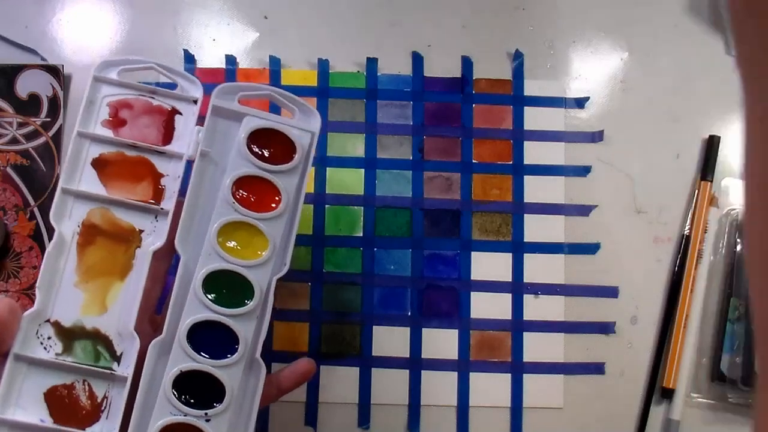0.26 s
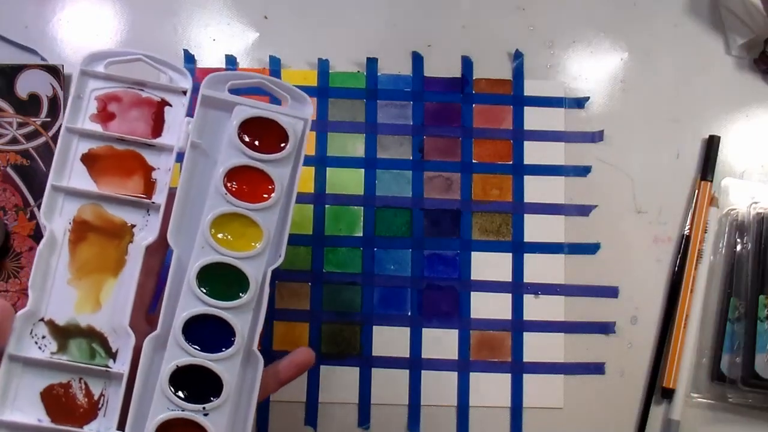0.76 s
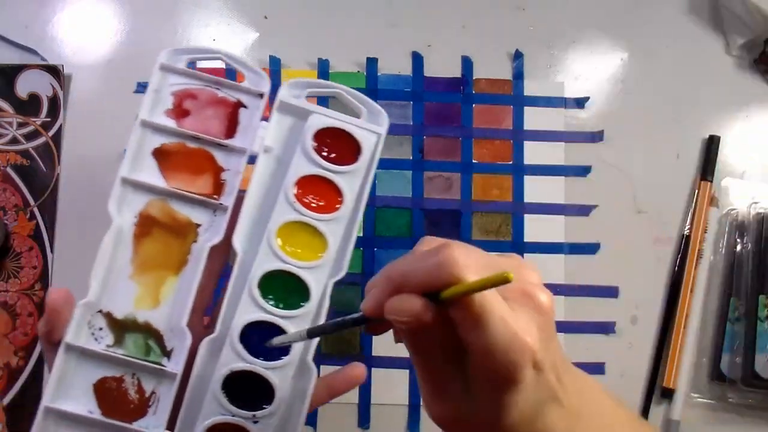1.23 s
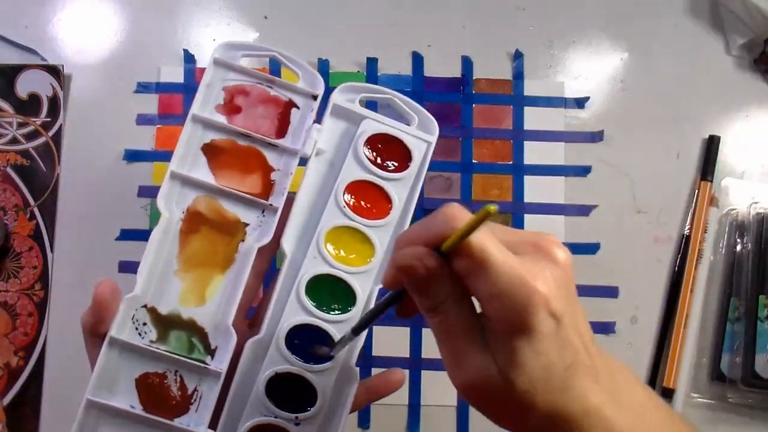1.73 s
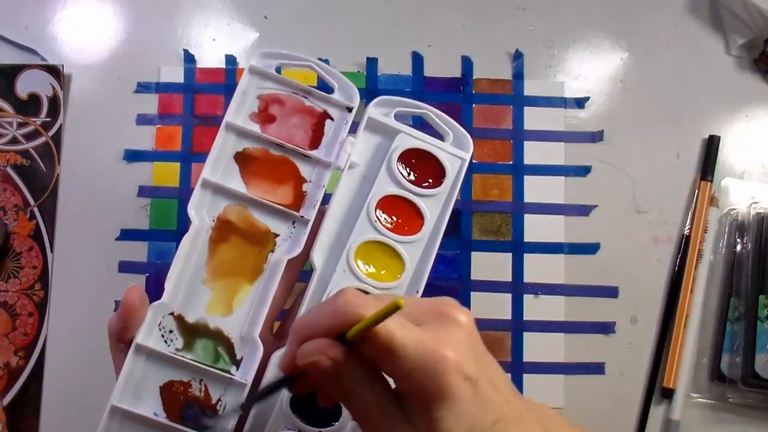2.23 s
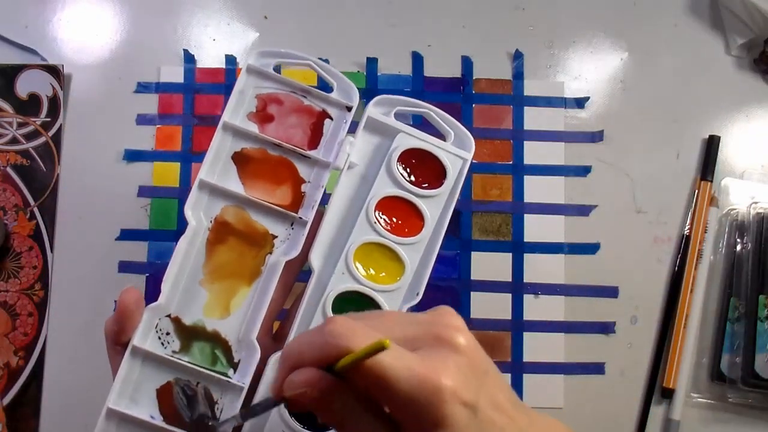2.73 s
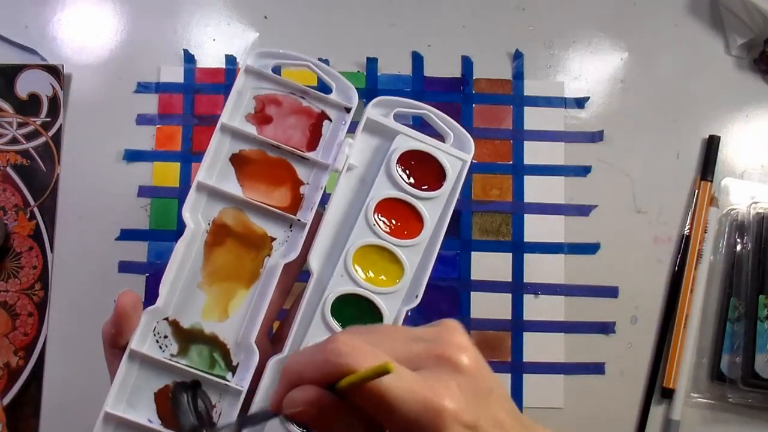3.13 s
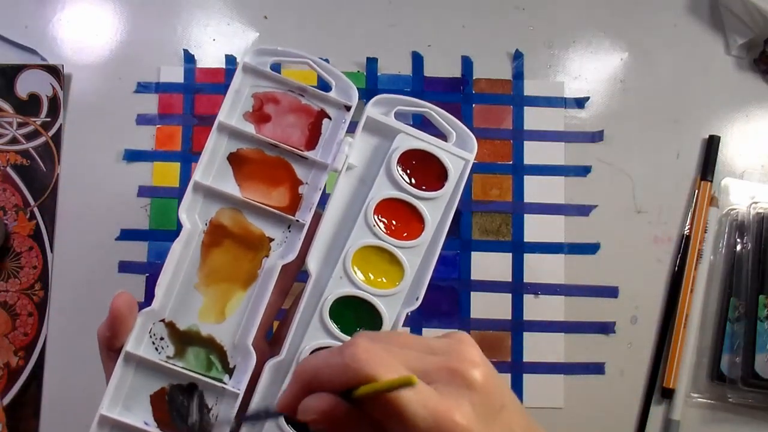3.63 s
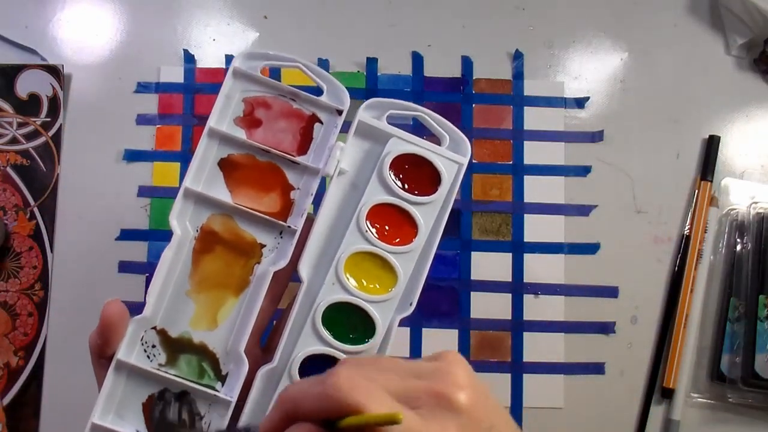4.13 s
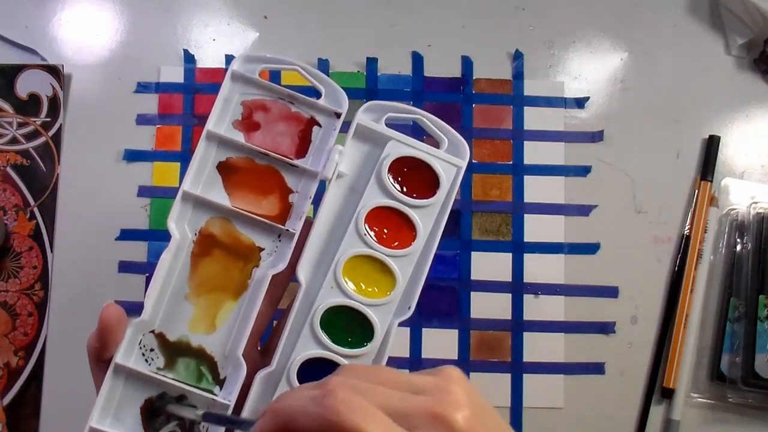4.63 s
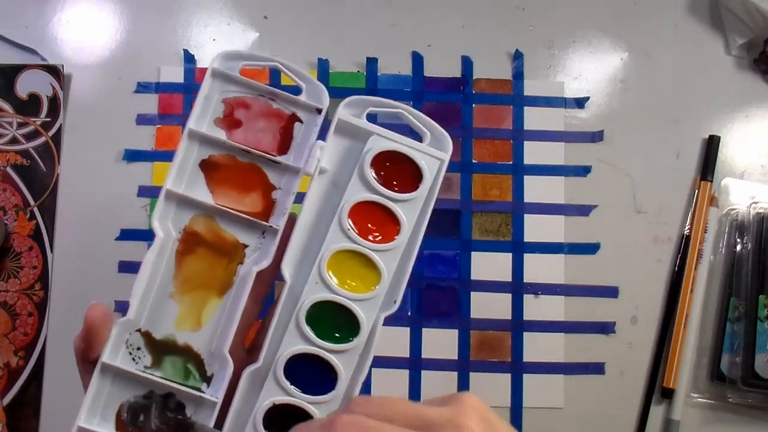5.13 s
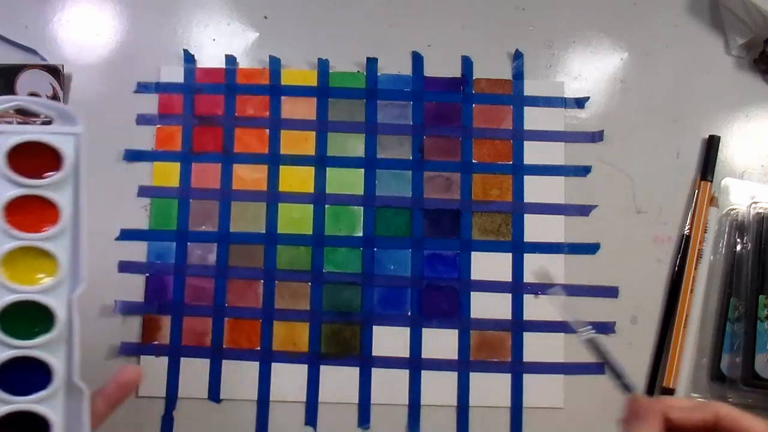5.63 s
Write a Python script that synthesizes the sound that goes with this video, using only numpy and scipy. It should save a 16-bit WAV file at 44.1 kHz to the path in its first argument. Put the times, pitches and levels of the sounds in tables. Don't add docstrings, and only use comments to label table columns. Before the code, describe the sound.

A brush is rinsed for half a second in a glass cup: gurgles, fine spray and rapid handle knocks, one very sharp crack, then a ringing rim clink. Tiny wet pops follow in near silence. Then soft bristle swishes and light metal-on-plastic taps on a paint tray, ending with a faint scrape over paper. Close stereo microphone, small room, steady low hum and hiss.

```python
import sys
import numpy as np
from scipy import signal
from scipy.fft import rfft, irfft
from scipy.io import wavfile

SR = 44100
rng = np.random.default_rng(int(sys.argv[2]) if len(sys.argv) > 2 else 0)


def bounce(signal):
    frames = np.transpose(np.atleast_2d(signal))
    limited = np.clip(frames, -1, 1)
    pcm = np.round(limited * 32767).astype(np.int16)
    wavfile.write(sys.argv[1], SR, pcm)


def undo_db(level):
    steps = np.asarray(level, float) / 20
    return 10 ** steps


N = 258426
TIME = np.arange(N) / SR


def rms_one(x):
    return x / np.sqrt(np.mean(x ** 2) + 1e-20)


def curve(points, hz):
    table_hz, value = np.transpose(points)
    return np.log(hz), np.log(table_hz), value


def spectrum_hz():
    return np.maximum(np.arange(N // 2 + 1) * SR / N, 1)


def coloured(white, points):
    db = np.interp(*curve(points, spectrum_hz()), left=-80, right=-80)
    return rms_one(irfft(rfft(white) * undo_db(db), N))


def train(times, sizes):
    out = np.zeros(N)
    np.add.at(out, (np.asarray(times) * SR).astype(int), sizes)
    return out


def ring(clicks, hz, t60):
    r, w = undo_db(-60 / (t60 * SR)), 2 * np.pi * hz / SR
    return signal.lfilter([0, np.sin(w)], [1, -2 * r * np.cos(w), r * r], clicks + 1e-18)


def strike(clicks, hz, t60, cycles):
    return ring(clicks, hz, t60) - ring(clicks, hz, cycles / hz)


def resonate(x, hz, width_hz):
    r = np.exp(-np.pi * width_hz / SR)
    feedback = [1, -2 * r * np.cos(2 * np.pi * hz / SR), r * r]
    return signal.lfilter([(1 - r * r) / 2, 0, (r * r - 1) / 2], feedback, x)


def grains(per_s, spread_db):
    sizes = undo_db(spread_db * np.minimum(rng.exponential(1, N), 4)) * rng.choice([-1, 1], N)
    return rms_one(sizes * (rng.random(N) < per_s / SR))


def pan(x, db):
    return np.array([x * undo_db(db / 2), x * undo_db(-db / 2)])


# (time [s], vigour [dB], depth of the brush [0-1])
SWIRL = [
    (0, -95, 0.5),
    (.045, -55.5, 0),
    (.1, -58, .02),
    (.13, -47, 0.16),
    (.195, -57, 0.1),
    (.215, -37.5, 0),
    (.27, -41.5, 0.64),
    (.34, -41.5, 0.45),
    (.49, -81, 0.94),
]


def swirl():
    s, vigour_points, depth_points = np.transpose(SWIRL)
    vigour_db = np.interp(TIME, s, vigour_points)
    depth = np.interp(TIME, s, depth_points)
    gurgle_db = vigour_db - 27.5 + 40.5 * depth
    spray_db = -55 + 0.67 * (vigour_db + 46.5) - 13.5 * depth
    return gurgle_db, vigour_db, spray_db


CUP_LOW_HZ = [705, 970, 1230, 1292, 1340, 1444, 1503, 1542, 1736, 1824, 2030]
# (level [dB], t60 [s])
CUP = [(-6, 0.039), (-3.5, 0.059), (-7, 0.063), (1, 0.11), (1, 0.027), (-13, 0.14), (7.5, 0.023),
       (-0.5, 0.044), (-3, 0.067), (-2, 0.042), (-0.5, 0.033),
       (-3.5, 0.034), (-1.5, 0.032), (-10, 0.026), (-2, 0.025), (-3, 0.046), (-8.5, 0.031),
         (-12.5, 0.046), (-17, 0.021)]
CUP_HIGH_HZ = [3170, 3275, 3590, 3920, 4830, 5890, 6300, 7600]
# (time [s], level [dB], centre frequency [Hz])
KNOCKS = [(.030, -39, 6340), (0.0353, -31.5, 1800), (.046, -38, 3170), (.047, -40, 6300), (.06, -45, 6300),
          (.072, -46, 6100), (.093, -46, 5200), (.143, -45, 4830), (.0807, -47, 1570),
          (0.1023, -30.5, 1520), (.144, -36.5, 3200), (.192, -37, 4830), (0.207, -38, 1500),
          (.2745, -41, 1300), (0.129, -41, 3250), (0.214, -33, 3370), (.337, -30, 5900), (0.251, -41, 3950),
          (.245, -39, 5900), (.334, -34, 3300), (.3372, -30, 3300), (0.3432, -32, 1610), (.345, -42, 3300),
          (.388, -54, 2960), (.398, -40, 3240), (.466, -52, 3270)]
# (time [s], level [dB], centre frequency [Hz], reach [octaves])
SLAPS = [
    (.104, -40, 3980, 0.96),
    (.129, -46, 2200, 0.45),
    (.173, -42, 5200, .37),
    (.207, -37, 4270, 1),
    (.222, -28, 1960, 0.33),
    (.246, -42, 5000, 0.46),
    (.276, -36, 755, 0.46),
]


def cup():
    knock_reach_oct = 0.15
    s, db, centre, reach = np.transpose(SLAPS + [(*knock, knock_reach_oct) for knock in KNOCKS])
    _, bubbles_db, spray_db = swirl()
    out = 0
    for hz, (mode_db, t60) in zip(CUP_LOW_HZ + CUP_HIGH_HZ, CUP):
        near = np.exp(-.5 * (np.log2(hz / centre) / reach) ** 2)
        blows = train(s, undo_db(db + mode_db - 3.0) * near * rng.choice([-1, 1], len(s)))
        patter_db = bubbles_db - 36.5 if hz < 2500 else spray_db - 24
        patter = grains(500, 1.9) * undo_db(mode_db + patter_db)
        tone = resonate(strike(blows + patter, hz, t60, cycles=5.0), hz, .4 * hz)
        out = out + pan(tone, -3.0 * (hz > 2500))
    return out


# (frequency [Hz], level [dB per Hz])
SPRAY_COLOUR = [(2000, -8), (2800, 0.5), (6000, -9), (12000, -9.5), (15000, -20)]


def slosh():
    gurgle_db, bubbles_db, spray_db = swirl()
    out = undo_db(spray_db - 3.5) * coloured(grains(9000, 2.5), SPRAY_COLOUR)
    kinds = (gurgle_db - 5.0, 470, 1150, 140), (bubbles_db, 1150, 2300, 200), (spray_db, 2500, 6800, 450)
    for level_db, low_hz, high_hz, count in kinds:
        for when, pitch, size in rng.random((count, 3)):
            i = int(when * .48 * SR)
            hz = low_hz * (high_hz / low_hz) ** pitch
            cycle = np.arange(2200) * hz / SR
            shape = (1 - np.exp(-cycle / 0.33)) * undo_db(-60 * cycle / 60)
            tone = np.sin(2 * np.pi * cycle * (1 + 0.0012 * cycle))
            out[i:i + 2200] += undo_db(level_db[i] + 4.0 + 5.3 * (size - 2.0)) * shape * tone
    return pan(out, -0.47)


# (time [s], level [dB], frequency [Hz], length [s])
GULPS = [(.1025, -28, 1252, .0055), (.1128, -26.5, 1288, .011), (.129, -42, 1390, 0.0077),
         (.146, -46, 1730, 0.018), (.146, -48, 1330, .008), (.172, -46.5, 1284, 0.012),
         (.2067, -27.5, 1315, 0.013), (.2215, -29, 1297, .013), (.2215, -32, 1563, 0.0095),
         (.2215, -31.5, 2043, 0.01), (.225, -32, 1730, 0.0087), (.235, -40, 1690, 0.0091),
         (.241, -41, 1365, .006), (.245, -41, 1550, .006), (.249, -38, 1790, .006),
         (.25, -46.5, 710, 0.0174), (.252, -45, 2160, .008), (.257, -42, 1760, 0.0057),
         (.2742, -25, 1520, 0.0076), (.286, -36, 1470, 0.0067), (.298, -40, 1470, .005),
         (.304, -37, 1510, 0.0086), (.3172, -34.5, 1820, 0.008), (.326, -39, 1510, .005),
         (.334, -47, 964, .012), (.342, -37, 1760, .006)]


def gulps():
    rise_per_s, sag_db_per_s, swell_s, burst_t60_s = 1.9, 154, 0.0016, 0.016
    out, age = np.zeros(N), np.arange(SR // 10) / SR
    for s, db, hz, length in GULPS:
        level_db = db - sag_db_per_s * age - 60 * np.maximum(age - length, 0) / burst_t60_s
        cycles = hz * age * (1 + rise_per_s * (age - length) / 2)
        tone = (1 - np.exp(-age / swell_s)) * np.sin(2 * np.pi * cycles)
        out[int(s * SR):][:len(age)] += undo_db(level_db) * tone
    return out


# (time [s], peak level [dB], level of the spray after it [dB], spray t60 [s])
CRACKS = [(.32, -56, -53.5, 0.19), (0.3365, -27, -51, 0.022), (0.3438, -11.5, -44, 0.079),
          (0.3448, -17, -58, 0.03), (0.389, -53, -47, 0.078), (0.6061, -22.5, -42, 0.12),
          (.64, -60, -60, 0.41), (.69, -59, -58.5, 0.14), (3.0463, -40, -48.5, 0.067),
          (3.151, -48, -49, 0.039), (3.886, -52, -57, 0.032), (3.9063, -35, -44, 0.032)]
# (frequency [Hz], level [dB per Hz])
CRACK_COLOUR = [(1180, -51), (2000, -2), (2690, -6), (3230, -4), (4380, -2), (9920, -10), (13800, -8),
                (15000, -42)]


def cracks():
    cup_side_db, tray_side_db = 0, 6
    spray, out = coloured(rng.standard_normal(N), CRACK_COLOUR), np.zeros((2, N))
    for s, peak_db, spray_db, t60 in CRACKS:
        age = np.maximum(TIME - s, 0)
        shape = undo_db(peak_db - 23.5 - 60 * age / 0.009) + undo_db(spray_db - 60 * age / t60)
        click = resonate(train([s], undo_db(peak_db + 11.0)), hz=8550, width_hz=5000)
        out += pan(click + spray * shape * (TIME >= s), cup_side_db if s < 1 else tray_side_db)
    return out


# (frequency [Hz], level [dB], t60 [s])
RIM = [(4900, -20, 0.19), (5071, -17, .2), (5123, -19, .2), (5774, -16, .12), (5996, -4, 0.12),
       (6032, -5, 0.12), (6079, -2, 0.16), (6163, -4, .14), (6266, -11, .12), (6342, -14, 0.12),
       (6446, -13, 0.12), (6532, -16, .12), (6734, -16, .1), (8900, -17, 0.08)]
# (frequency [Hz], level [dB], t60 [s])
HANDLE = [(608, -11, 0.031), (660, -10, 0.03), (1324, -11, 0.045), (1800, -2.5, 0.063), (1960, -6.5, 0.046),
          (3300, -3, 0.025), (4130, -4.5, 0.027), (6110, 7.5, 0.015)]
# (time [s], level [dB], left minus right [dB])
CLINKS = [
    (.591, -64.5, -2),
    (0.6067, -31, 0),
    (.692, -60, -4),
]


def rim():
    s, db, side_db = np.transpose(CLINKS)
    out = 0
    for hz, mode_db, t60 in RIM + HANDLE:
        tone = strike(train(s, undo_db(db + mode_db)), hz, t60, cycles=5.1)
        out = out + pan(tone, side_db.mean() * min(hz / 5000, 1))
    return out


PAIR_HZ = [1730.2, 1738.3]
# (level [dB], t60 [s])
PAIR = [(-7.5, 0.76), (-11.5, 0.67)]


def rim_pair():
    damp_s, damp_length_s, damp_db = 0.679, 0.01, -5
    clink_s, clink_db, _ = CLINKS[1]
    main = train([clink_s], undo_db(clink_db))
    lower, upper = (undo_db(db) * strike(main, hz, t60, cycles=12.0) for hz, (db, t60) in zip(PAIR_HZ, PAIR))
    damping = undo_db(damp_db * np.clip((TIME - damp_s) / damp_length_s, 0, 1))
    return pan(damping * (lower + np.roll(upper, 11)), -.6)


def chatter():
    start_s, length_s, level_db, t60_s = 0.622, 0.092, -84, 0.029
    age = TIME - start_s
    skips = undo_db(level_db) * (age > 0) * (age < length_s)
    return pan(sum(ring(skips * grains(150, 3.0), hz, t60_s) for hz, _, _ in RIM), -1.0)


# (time [s], level [dB], frequency [Hz])
SMALL_RINGS = [(.001, -52, 2540), (.085, -50, 5400), (.155, -59, 6500), (.176, -52, 5950), (.222, -58, 7660),
               (.6075, -42, 1900), (.612, -52, 2120), (.612, -43, 690), (.695, -50, 4900), (.78, -59, 840),
               (.833, -65, 687), (.975, -60, 3070), (1.065, -61, 2930), (1.088, -61, 3160), (3.1515, -47, 3750),
               (3.1525, -48, 1220), (3.9062, -45, 10060), (3.9062, -45, 5890), (5.8065, -56, 2000)]


def small_rings():
    return sum(strike(train([s], undo_db(db)), hz, 0.04, cycles=6.4) for s, db, hz in SMALL_RINGS)


# (time [s], level [dB])
PUSHES = [(2.25, -66), (2.42, -58.5), (2.589, -57), (2.765, -58.5), (3.216, -63), (3.285, -57.5),
          (3.491, -63.5), (3.86, -64.5), (4.148, -59.5), (4.329, -59.5), (4.48, -63), (5.072, -56)]
# (time [s], level [dB])
RETURNS = [(2.347, -67), (2.506, -65.5), (2.67, -63), (2.845, -64.5), (3.096, -58.5), (3.39, -64.5),
           (3.637, -64), (3.941, -63), (4.066, -65.5), (4.242, -67), (4.61, -70)]
# (time [s], level [dB])
DRAGS = [
    (2.925, -61.5),
    (3.155, -59.5),
    (3.799, -67.5),
    (4.706, -70),
    (4.79, -71),
    (4.85, -69),
    (4.91, -63),
    (5.213, -66.5),
]
# (frequency [Hz], width [Hz], level [dB])
BRISTLE = [(2620, 400, 3), (3300, 760, 2.5), (4860, 45, 9), (5790, 180, 5), (6640, 180, -10),
           (9150, 280, 0), (12100, 220, -11)]
# (frequency [Hz], level [dB per Hz])
HISS = [(1500, -36), (2500, -3.5), (4000, -4), (6000, -0.5), (9000, -0.5), (13000, 1.5), (15500, -8)]


def strokes():
    body, hiss = 0, 0
    for rows, length, body_db in (PUSHES, 0.029, -1.8), (RETURNS, 0.064, -2.5), (DRAGS, 0.023, 3.2):
        swell = sum(undo_db(db) * np.exp(-1.4 * ((TIME - s) / length) ** 2) for s, db in rows)
        body = body + undo_db(body_db) * swell
        hiss = hiss + np.interp(TIME - 0.0027, TIME, swell)
    slips = grains(3500, 0.85)
    low = rms_one(sum(undo_db(db) * resonate(slips, hz, width) for hz, width, db in BRISTLE[:2]))
    high = rms_one(sum(undo_db(db) * resonate(slips, hz, width) for hz, width, db in BRISTLE[2:]))
    bright = undo_db(-6.5) * np.sqrt(hiss / undo_db(-55.0)) * high
    return undo_db(-1.5) * body * low + hiss * (bright + undo_db(-2.0) * coloured(slips, HISS))


# (time [s], level [dB], dullness as low over high pitches [dB])
TAPS = [(0.441, -47, 1), (0.692, -56, 5), (2.336, -53.5, -1.5), (2.512, -47, -1), (2.669, -55, -0.5),
        (2.853, -48, -3.5), (3.046, -45, -1.5), (3.152, -46.5, -9.5), (3.186, -52, -1.5), (3.374, -48, -2),
        (3.885, -46, -3), (3.905, -44, -2.5), (4.074, -46, -2.5), (4.255, -45, -2.5), (4.449, -55, 1.5),
        (4.502, -62, 12), (4.548, -49.5, -3), (4.999, -50.5, -0.5), (5.111, -46, -3.5), (5.246, -48.5, -3),
        (5.339, -61, -7), (5.399, -47.5, -5.5), (5.806, -53.5, -10)]
# (frequency [Hz], level [dB], t60 [s])
TRAY = [(663, -8, 0.053), (842, 0.5, 0.025), (1000, -5, 0.02), (1300, -19, 0.043), (2073, -12, 0.032),
        (2484, -3.5, 0.014), (2685, -1.5, 0.02), (3030, -8.5, 0.021), (3438, -12.5, 0.05),
        (3990, -15.5, 0.028)]


def taps():
    lag_s, bounce_s, bounce_db = .0006, .007, -10.5
    s, db, dull_db = np.transpose(TAPS)
    out = 0
    for hz, mode_db, t60 in TRAY:
        size = undo_db(db + mode_db + 5.5 + dull_db * (hz < 1500) + rng.normal(0, 1.2, len(s)))
        bounce_times = s + bounce_s * rng.uniform(.8, 1.2, len(s))
        blow = train(s + lag_s, size) + train(bounce_times, size * undo_db(bounce_db))
        contact = signal.lfilter([1], [1, -undo_db(-60 / (.025 * SR))], blow)
        rattle = contact * rng.standard_normal(N) * undo_db(-29)
        out = out + strike(blow + rattle, hz, min(t60, 0.04), cycles=3.5)
    return out


# (frequency [Hz], level [dB])
FERRULE = [(1000, -35), (1400, -39), (6024, -40.5), (7165, -39), (9125, -40.5), (11600, -39)]


def flat_strike():
    return sum(strike(train([3.0465], undo_db(db)), hz, 0.015, cycles=6.4) for hz, db in FERRULE)


# (time [s], level [dB], frequency [Hz], half length [s])
SQUEAKS = [(2.421, -61, 5800, .02), (2.593, -57, 5831, .014), (2.589, -61, 4921, .012),
           (2.758, -59, 5831, .012), (3.279, -60, 5800, .009), (4.132, -61, 5801, .008),
           (4.128, -59, 3421, .0061), (5.075, -62, 3400, .012), (3.14, -62, 4950, .014),
           (5.808, -68, 6101, .008), (5.819, -67, 5151, .008), (5.851, -64, 5851, .01)]


def squeaks():
    rub, out = rng.standard_normal(N), 0
    for s, db, hz, half in SQUEAKS:
        swell = np.exp(-((TIME - s) / half) ** 2)
        out = out + undo_db(db) * swell * rms_one(resonate(rub, hz, width_hz=81))
    return out


# (time [s], frequency [Hz])
TICKS = [(0.974, 4850), (1.0226, 7910), (1.0858, 6820), (1.1044, 4130), (1.129, 7600), (1.155, 5270),
         (1.295, 7350), (1.3054, 9380), (1.3154, 5720), (1.3644, 5800), (1.4424, 4610), (1.524, 7350),
         (1.609, 6370), (1.751, 7900), (1.782, 4000), (1.783, 9300), (1.846, 5830), (1.8761, 7700),
         (1.9894, 7630), (2.0342, 9310), (2.2094, 5110)]


def ticks():
    level_db, db_per_oct = -48.5, 10
    out = 0
    for s, hz in TICKS:
        size = undo_db(level_db + db_per_oct * np.log2(hz / 7000))
        out = out + ring(train([s], size), hz, 14 / hz)
    return out


# (frequency [Hz], level [dB per Hz])
RUSTLE_COLOUR = [(410, -44), (700, -20), (1220, 5.5), (1440, -3), (2910, -1), (5990, -4.5), (10000, -39),
                 (13000, -51)]


def rustle():
    full_speed_s, full_db, rise_db_per_s = 5.78, -61.5, 85
    level_db = full_db + rise_db_per_s * np.minimum(TIME - full_speed_s, 0)
    return undo_db(level_db) * coloured(grains(5000, 1.8), RUSTLE_COLOUR)


def room(x, t60, wet_db, lead):
    at_cup_until_s = 1.0
    age = np.arange(SR // 2) / SR
    mid, side = rng.standard_normal((2, len(age)))
    side = signal.lfilter(*signal.butter(1, 2200, "high", fs=SR), side)
    tail = (mid + side * [[1], [-1]]) * undo_db(-60 * age / t60) * np.clip(age / 0.0053, 0, 1)
    tail = signal.lfilter([1], [1, -.3], tail) / np.sqrt(np.sum(tail ** 2) / 2)
    treble = signal.lfilter(*signal.butter(2, 3500, "high", fs=SR), x)
    shift = lead * (np.arange(N) < at_cup_until_s * SR) * np.gradient(treble, axis=1) * [[1], [-1]]
    echoes = signal.fftconvolve(tail, x.mean(axis=0)[None])[:, :N]
    return x + shift + undo_db(wet_db) * echoes


# (peak level [dB], signed size [-1 to 1])
MAINS = [(-49.5, 1), (-54.5, 0.96), (-69.5, 0.97), (-63, -0.86), (-74, -0.58), (-79.5, 0.87), (-92, -0.58),
         (-100.5, 0.64), (-78.5, 0.79)]
MOTOR = [-71, -51, -77, -65.5, -74]


def hum():
    mains_hz, motor_hz = 60.011, 14.983
    turn = 2 * np.pi * TIME
    out = 0
    for k, (db, sign) in enumerate(MAINS, 1):
        out = out + sign * undo_db(db) * np.cos(k * (mains_hz * turn + 2) - 2.5)
    for k, db in enumerate(MOTOR, 1):
        phase = 3.1 if k % 2 == 0 else 1.5
        out = out + undo_db(db) * np.cos(k * (motor_hz * turn + 1.1) - phase)
    return pan(out, -0.57)


# (frequency [Hz], level [dB per Hz])
FLOOR = [(190, -14.5), (330, -1.5), (534, -1.5), (837, -5), (1490, -7), (13300, -13), (14400, -8.5),
         (15300, -63)]
# (frequency [Hz], level [dB per Hz])
RUMBLE = [(12, -0.5), (30, 4), (60, -5), (100, -4.5), (200, -11), (330, -21.5)]
# (frequency [Hz], likeness [0-1])
LIKENESS = [(20, 0.54), (200, 0.26), (500, 0.16), (1500, 0.3), (4000, 0.029), (14000, 0.027)]


def floor():
    hiss_db, rumble_db, whine_db = -61.5, -61, -78
    whine_hz, whine_width_hz = 1654, 113
    mid, side = rng.standard_normal((2, N))
    alike = np.clip(np.interp(*curve(LIKENESS, spectrum_hz())), 0, 1)
    shared, apart = np.sqrt(1 + alike) * rfft(mid), np.sqrt(1 - alike) * rfft(side)
    pair = irfft(shared + apart * [[1], [-1]], N)
    whine = rms_one(resonate(resonate(pair, whine_hz, whine_width_hz), whine_hz, whine_width_hz))
    hiss, rumble = coloured(pair, FLOOR), coloured(pair, RUMBLE)
    return undo_db(hiss_db) * hiss + undo_db(rumble_db) * rumble + undo_db(whine_db) * whine


def scene():
    at_cup = cup() + slosh() + cracks() + rim()
    at_middle = gulps() + small_rings() + strokes() + taps() + flat_strike() + squeaks() + ticks() + rustle()
    near = at_cup + pan(at_middle, 0.062)
    return room(near, t60=0.27, wet_db=-12.0, lead=0.55) + rim_pair() + chatter() + hum() + floor()


def low_pass(x):
    return signal.sosfilt(signal.butter(12, 15460, fs=SR, output="sos"), x)


def record(dry):
    duck_s, fall_s, back_s, duck_db, gain_db = 0.348, 0.06, 0.55, -3.5, .5
    age = TIME - duck_s
    dip = np.clip(np.minimum(age / fall_s, 1 - age / back_s), 0, 1)
    top_cut = signal.cheby2(16, 45, 14600, fs=SR, output="sos")
    mix = signal.sosfilt(top_cut, dry * undo_db(gain_db + duck_db * dip))
    return low_pass(mix)


dry = scene()
out = record(dry)
bounce(out)
```